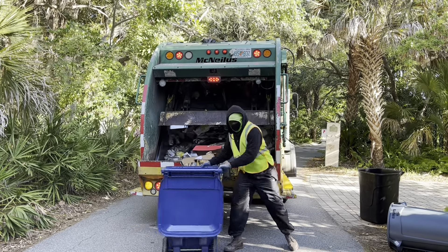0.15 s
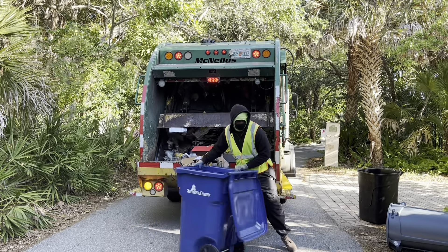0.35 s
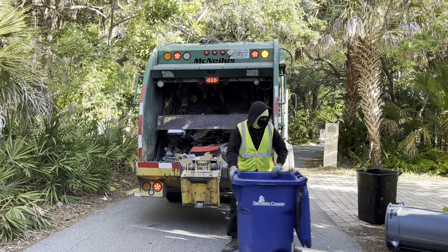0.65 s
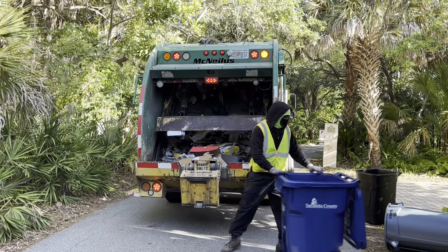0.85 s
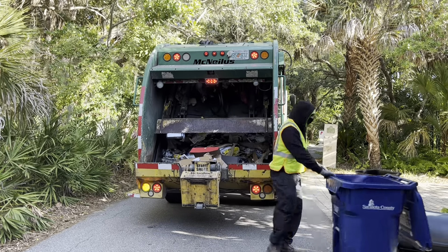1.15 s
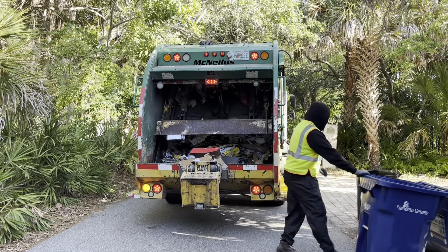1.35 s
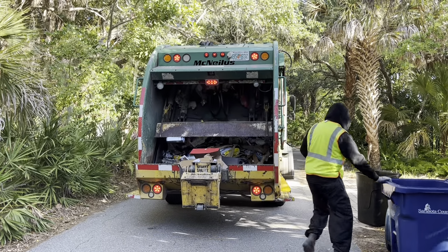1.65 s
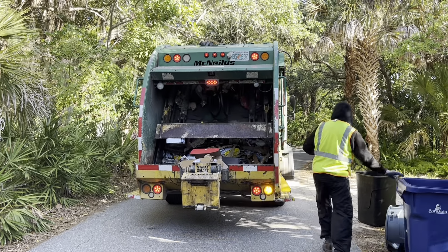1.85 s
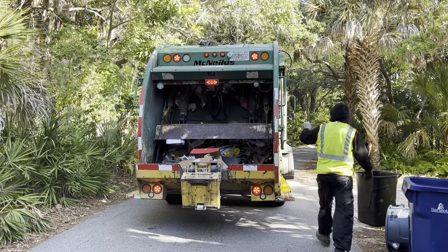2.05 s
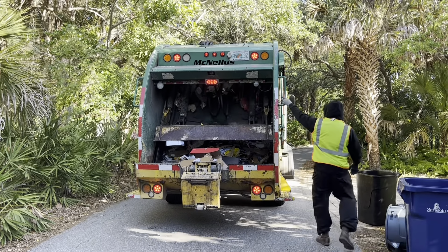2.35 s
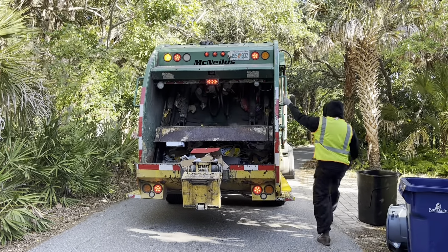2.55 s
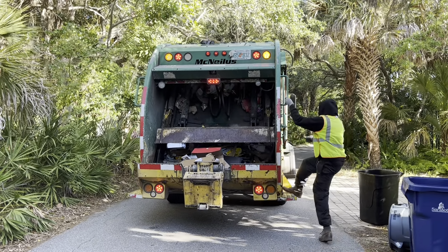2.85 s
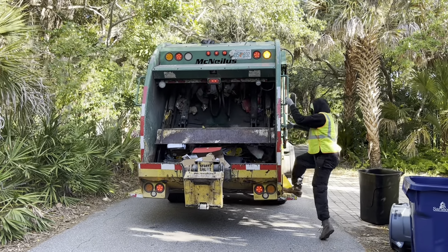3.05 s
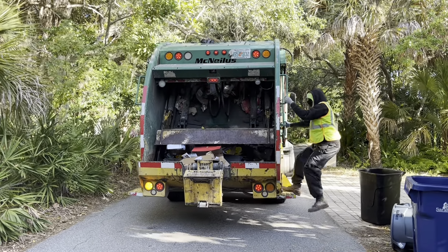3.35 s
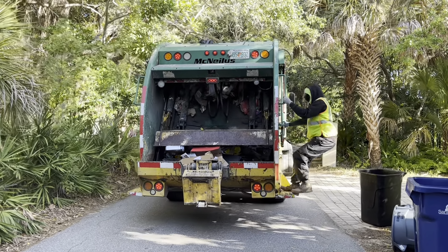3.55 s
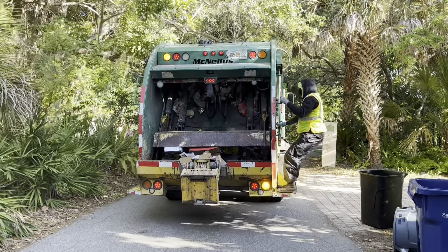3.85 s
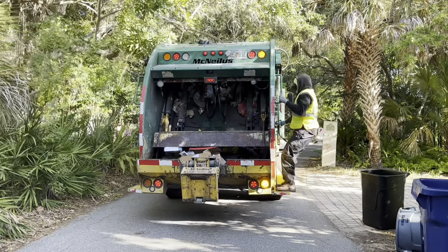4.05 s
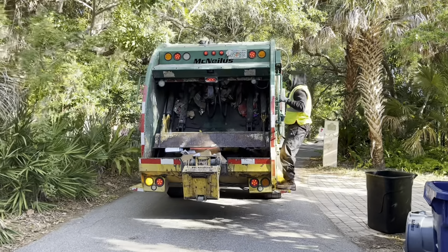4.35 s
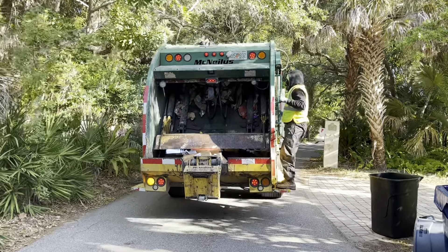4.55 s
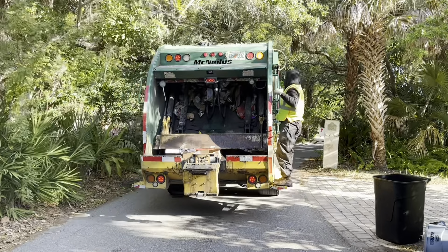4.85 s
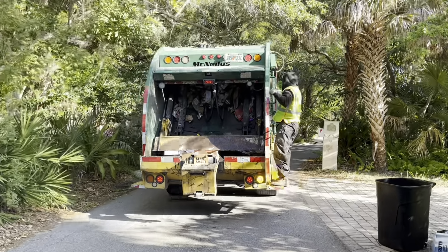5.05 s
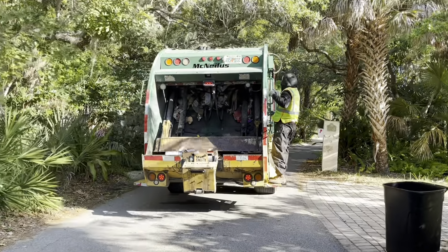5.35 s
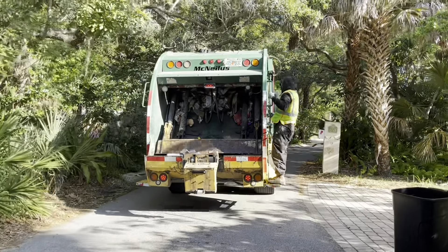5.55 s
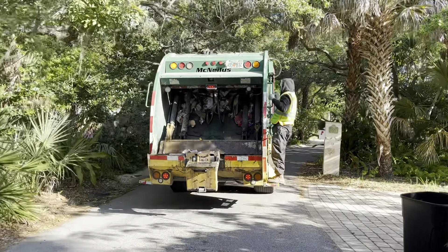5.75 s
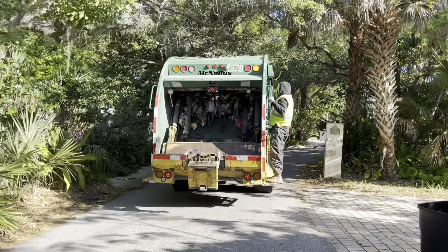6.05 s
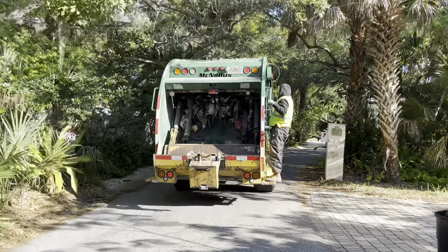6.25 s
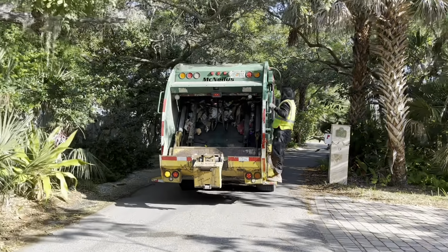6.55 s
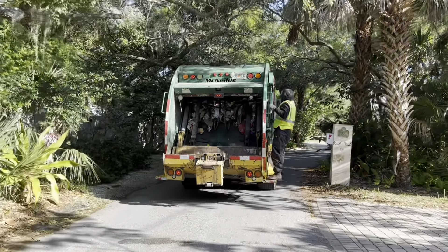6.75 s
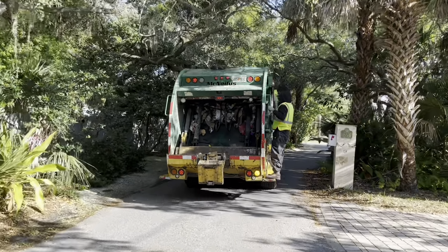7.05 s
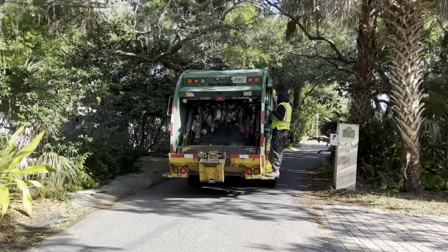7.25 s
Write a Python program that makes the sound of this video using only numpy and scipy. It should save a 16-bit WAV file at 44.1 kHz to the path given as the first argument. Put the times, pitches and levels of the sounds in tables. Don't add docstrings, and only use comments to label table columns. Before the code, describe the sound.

Close on a leafy street, a heavy diesel idles with a low hydraulic hum. An empty plastic wheeled bin slams its lid, booms and rattles over the ground, then is set down. A sharp air-brake hiss vents, a gear clunks, and the engine climbs steadily in pitch and loudness. Near the end loose steel bangs twice with a short squeak. Handheld phone, stereo, dry outdoor sound.

```python
import sys
import numpy as np
from scipy import signal
from scipy.fft import rfft, irfft, next_fast_len
from scipy.io import wavfile
from scipy.ndimage import uniform_filter1d, map_coordinates

SR = 44100
rng = np.random.default_rng(int(sys.argv[2]) if len(sys.argv) > 2 else 0)


def output_pcm(signal):
    pcm = np.clip(np.atleast_2d(signal).T, -1, 1) * 32767
    wavfile.write(sys.argv[1], SR, np.round(pcm).astype(np.int16))


def how_loud(loudness_db):
    steps = np.asarray(loudness_db, float) / 20
    return 10 ** steps


N = 325899
T = np.arange(N) / SR
DIRECT = np.array([[1], [0]])

# time in seconds, exhaust beat in Hz.
SPEED_HZ = [(0, 21.8), (1, 21.5), (1.75, 19.7), (2, 18.7), (2.4, 17.7), (2.8, 18.3), (3.2, 18.7),
            (3.89, 19.15), (4.1, 21.6), (4.28, 24.5), (4.49, 26.3), (5, 29.1), (5.5, 31.2), (6, 33),
            (6.47, 35.4), (6.8, 36.2), (7.14, 38.3), (7.39, 39.3)]
# time in seconds, exhaust note in dB, block roar in dB.
EFFORT_DB = [(0, -33, -34), (1, -32, -40.5), (1.9, -43, -41.5), (2.5, -39, -40.5), (3.1, -35.5, -39.5),
             (3.86, -35, -40), (4, -31.5, -36), (4.3, -28, -37), (4.6, -26.5, -35.5), (4.9, -24, -34.5),
             (5.5, -23.5, -32.5), (5.8, -23.5, -32), (6.1, -23, -33), (6.45, -23.5, -29.5),
             (6.76, -22, -28), (7, -21, -31), (7.39, -19, -31)]
# multiple of the beat, idle level in dB, loaded level in dB.
EXHAUST_ORDERS = [(2, 4, -0.5), (3, -1, -1), (4, 3, 0.5), (5, -5, -12), (6, 1, -5), (8, -21, -20),
                  (12, -6, -4), (16, -8, -2)]
# frequency in Hz, gain in dB.
PIPE_DB = [(40, -13.5), (60, -19), (68, -11.5), (77, -2), (100, 2), (120, -0.5), (150, -7), (200, -23.5)]
# time in seconds, width in seconds, change in dB.
STUMBLES_DB = [
    (2.235, 0.021, -4),
    (2.3, 0.013, -12),
    (6.54, 0.072, 3),
]
# harmonic number, level in dB.
PUMP_HARMONICS = [(1, 0), (2, 1), (3, -3), (4, -19), (5, -18)]
# frequency in Hz, level in dB.
PUMP_LINE_DB = [(115, -51), (125, -43), (135, -44.5), (165, -33.5), (182, -33.5), (213, -29.5),
                (226, -37.5), (245, -34.5), (265, -36)]
# frequency in Hz, level in dB per Hz.
BLOCK_DB = [(300, 2.5), (500, 0.5), (800, -7), (1200, -8.5), (1600, -9.5), (2100, -16), (3000, -18.5),
            (3800, -19.5), (5500, -23), (7500, -19.5), (10000, -22.5), (12000, -24), (14000, -22.5),
            (15500, -39)]
# time in seconds, centre in Hz, level in dB.
BELT_SIZZLE = [(0, 4450, -55), (1.95, 4060, -70), (2.1, 4150, -59), (2.6, 4420, -57), (3.1, 4380, -57),
               (3.7, 4380, -57), (4.1, 4620, -53), (4.4, 4600, -52), (5, 4480, -53), (6.3, 4420, -49),
               (7.39, 4320, -50)]

# time in seconds, wall shake in dB.
ROLL_DB = [
    (0, -62),
    (.1, -22),
    (.3, -22.5),
    (.5, -28),
    (.95, -22.5),
    (1.18, -26.5),
    (1.34, -27),
    (1.45, -47),
    (1.62, -31.5),
    (2.1, -35),
]
# frequency in Hz, width in Hz, level in dB.
DRUM_MODES = [(73, 42, -6.5), (107.8, 28.7, -1.5), (147, 40, -10.5), (273, 84, -6.5), (323, 24, -5.5),
              (403, 117, -1.5), (540, 1260, -16)]
# time in seconds, level in dB, t60 in seconds.
WHEEL_BUMPS = [(.14, -16, 0.24), (.324, -18.5, 0.46), (.42, -19.5, 1), (.7, -20, .2), (.733, -4.5, 0.22),
               (.803, -14, 0.12), (.956, -6.5, 0.1), (1.056, -12.5, 0.15), (1.217, -12.5, 0.33),
               (1.305, -14, 0.22), (1.345, -15, 0.26), (1.592, -20.5, 0.49)]
# time in seconds, peak in dB, treble in dB, wall note in Hz.
WALL_KNOCKS = [(0.034, -45, -5, 290), (0.117, -9.5, -3.5, 519), (0.136, -17, -13, 423),
               (0.159, -10.5, -13, 330), (0.193, -9, -15.5, 327.5), (0.265, -27.5, 0, 450),
               (0.274, -21, -5, 403), (0.323, -10.5, -22, 345), (0.357, -15, -32, 336),
               (0.457, -26, -30, 473), (0.49, -26, -28, 285), (0.617, -13, -30, 426),
               (0.705, -10.5, -27, 473), (0.752, -16, -25, 462), (0.817, -26, -47, 424),
               (0.875, -20.5, -24, 597), (0.908, -15, -21.5, 456), (1.033, -21.5, -21, 474),
               (1.138, -25, -24, 417), (1.306, -25, -32, 424), (1.584, -22, -20, 483),
               (1.635, -29.5, -16, 290), (1.66, -16, -45, 465), (1.809, -23.5, -25, 530),
               (1.825, -34, -3.5, 418), (1.868, -29, -19, 415), (1.962, -29, -14.5, 273),
               (2.257, -25.5, -25, 255), (2.314, -27.5, -35, 272)]
# frequency in Hz, level in dB per Hz.
PLASTIC_DB = [(600, 3.5), (900, 5.5), (1400, 1), (2000, -2.5), (3000, -9.5), (4200, -16), (6000, -22),
              (7500, -22), (8300, -29), (9300, -31), (11500, -38), (15500, -62)]
# time in seconds, level in dB, t60 in seconds.
LID_SLAMS = [
    (0.11, -10, 0.47),
    (.16, -19.5, 0.74),
    (.265, -26, 0.41),
    (.33, -22, 0.29),
    (1.58, -19.5, 0.057),
]
# time in seconds, level in dB, t60 in seconds.
AXLE_CLACKS = [(0.098, -23, 0.049), (0.115, -12.5, 0.068), (0.138, -14, 0.073), (.163, -23, 0.049),
               (.195, -26, 0.069), (.2704, -24, 0.036), (0.316, -17, 0.045), (.3353, -29, 0.037),
               (0.356, -19, 0.056), (.452, -33, 0.038), (.619, -31, 0.037), (.688, -29, 0.072),
               (.711, -27, 0.078), (.752, -21, 0.093), (.816, -38, 0.024), (.8755, -26.5, 0.045),
               (.889, -34, 0.049), (0.915, -30.5, 0.1), (.945, -31, 0.15), (0.994, -27, .06),
               (1.032, -29, 0.05), (1.058, -36, .05), (1.115, -35, .05), (1.135, -34, 0.11),
               (1.179, -31, .05), (1.2, -31.5, 0.087), (1.249, -40, 0.045), (1.308, -34, 0.041),
               (1.344, -32.5, 0.059), (1.936, -38, 0.054), (2.206, -36, 0.056), (2.258, -38, .04),
               (2.315, -37, .04)]
# frequency in Hz, width in Hz, gain in dB.
LID_MODES = [(1220, 73, 4.5), (1530, 170, 5), (1985, 80, 6), (2380, 160, 2.5), (3080, 250, 3),
             (3680, 250, 0), (4100, 200, 5.5)]
# time in seconds, level in dB, t60 in seconds.
GRIT_SCUFFS = [(0.032, -34.5, 0.089), (.114, -24.5, .04), (.15, -43, 0.27), (.266, -33, 0.32),
               (.452, -46, 0.06), (.615, -41, 0.19), (.69, -47, .1), (1.582, -36, 0.035), (1.6, -70, 0.36),
               (1.73, -55, .1), (1.827, -37.5, 0.083), (1.96, -51, 0.16), (2.225, -50, .15)]

# start in seconds, end in seconds, frequency in Hz, level in dB, width in Hz.
FUZZY_TONES = [(6.665, 6.748, 5930, -36, 300), (6.665, 6.748, 11860, -39, 300), (6.675, 6.7, 2990, -33, 80),
               (0, .1, 290, -34, 5), (.125, .22, 70, -17, 5), (6.485, 6.62, 62, -20, 5), (4.03, 4.13, 288, -37, 5),
               (4.035, 4.07, 3240, -46, 60), (4.068, 4.097, 3240, -43, 40), (4.064, 4.086, 1700, -37, 40),
               (1.75, 2.7, 273, -41, 2), (1.78, 1.99, 258, -38, 2), (2.69, 2.73, 4850, -46, 150),
               (2.7, 2.73, 4000, -47, 150), (2.755, 2.8, 2500, -47, 100), (2.73, 2.755, 1850, -47, 100),
               (2.9, 3.22, 14800, -62, 120), (1.215, 1.3, 8900, -57, 60), (1.89, 1.91, 11100, -52, 80),
               (1.91, 1.94, 11100, -60, 80), (.488, .503, 2050, -38, 60), (4.037, 4.054, 2080, -43, 60)]
# time in seconds, level in dB, frequency in Hz, t60 in seconds.
PART_RINGS = [(.096, -26, 2350, 0.07), (.113, -13, 2370, 0.063), (0.11, -15, 3000, 0.054),
              (.16, -18, 1950, 0.23), (0.16, -15, 1600, 0.34), (0.27, -25, 3900, .1),
              (0.268, -27, 3020, 0.063), (.332, -32, 2330, 0.061), (0.34, -20, 1400, 0.073),
              (.678, -33, 1750, 0.073), (0.7, -31, 1800, .08), (0.72, -31, 1200, .06),
              (1.586, -18, 200, 0.21), (1.587, -30, 1800, 0.063), (3.979, -34, 980, 0.093),
              (6.495, -23, 2100, .06), (6.512, -24.5, 1860, .16), (6.445, -29, 2100, 0.065),
              (7.4, -29, 2100, .06), (2.262, -24, 128, 0.082), (2.316, -32, 136, 0.09),
              (.165, -14, 330, 0.26), (.15, -16, 385, 0.22), (1.585, -24.5, 280, 0.18),
              (0.36, -22, 620, .08), (6.483, -23.5, 2600, 0.082), (6.535, -18, 460, 0.092),
              (.326, -16, 280, .3), (5.985, -29.5, 800, .12), (6.33, -36, 1150, 0.35),
              (7.28, -34.5, 1020, 0.38), (4.66, -35.5, 750, 0.38), (0.65, -19, 850, .06),
              (.816, -27, 950, 0.054), (.877, -26, 700, .05), (1.031, -27, 930, .07),
              (1.308, -30, 740, .06), (.619, -24, 740, 0.097), (.915, -26, 920, 0.066),
              (1.345, -24, 695, 0.048), (6.553, -26, 3000, .12), (6.719, -18.5, 994, 0.073),
              (6.741, -16, 713, 0.12), (.636, -16, 440, .16), (.395, -22, 270, .25),
              (6.495, -18.5, 175, 0.23), (6.735, -33, 2900, 0.1), (6.742, -21, 1310, 0.13),
              (6.762, -25, 2030, 0.089), (7.5, -33, 2000, .15)]
# time in seconds, peak in dB, t60 in seconds.
BODY_TICKS = [
    (0.752, -19.5, 0.03),
    (4.3812, -32.5, 0.046),
    (5.4573, -25, 0.049),
    (5.7395, -35, 0.05),
    (6.4476, -27.5, 0.073),
]

# time in seconds, jet level in dB.
VENT_DB = [
    (2.65, -76),
    (2.656, -40),
    (2.67, -39),
    (2.694, -33.5),
    (2.774, -35),
    (2.994, -55.5),
    (3.192, -55),
    (3.5, -64),
]
# frequency in Hz, level in dB per Hz.
JET_DB = [(700, 26.5), (1500, 0.5), (2300, -1.5), (3300, -4.5), (5000, -1.5), (7000, 3), (9000, 1.5),
          (11000, 1), (13000, -2.5), (15500, -3)]
# frequency in Hz, width in Hz, gain in dB.
NOZZLE_MODES = [(1800, 250, 5.5), (2450, 240, 6), (3320, 400, 8), (3940, 290, 7), (4700, 350, 7.5),
                (10240, 200, 3), (11300, 790, 4.5)]
# time in seconds, pitch in Hz, level in dB.
VALVE_WHISTLE = [
    (2.68, 3480, -70),
    (2.7, 3500, -41),
    (2.715, 3500, -35),
    (2.735, 3210, -37),
    (2.757, 3180, -36),
    (2.79, 3200, -65),
]

# time in seconds, peak in dB, thud in dB, treble in dB, t60 in seconds.
TRUCK_BANGS = [(4.032, -29, -8, -24, 0.21), (5.989, -22, -1, -29, 0.22), (6.468, -19, -3, -20, .1),
               (6.478, -11, 7, -15, 0.1), (6.491, -16.5, -8, -25, 0.26), (6.519, -18, 0, -24, 0.21),
               (6.534, -14.5, -10, -27, 0.11), (6.553, -16, -6, -9, 0.16), (6.579, -17, -3, -20, 0.19),
               (6.718, -9.5, -20, -7.5, 0.15), (6.727, -9.5, -10, -31, 0.14),
               (6.745, -16.5, 1.5, -25, 0.18), (6.779, -31, -3, -5, 0.19), (6.929, -25, 14, -5, 0.25)]
# frequency in Hz, level in dB per Hz.
STEEL_DB = [(50, 2), (80, 11), (150, -5), (300, -7), (500, -7), (900, -16), (1400, -22), (2000, -22),
            (3300, -23), (5000, -26), (7500, -24.5), (11500, -31.5), (15500, -43)]
# frequency in Hz, first blow in dB, second blow in dB, t60 in seconds.
LIFTER_MODES = [(352.7, -4, -1, 0.23), (515, 1, -18, 0.26), (711, -7.5, 2, 0.54), (985, -23, -5, 0.16),
                (1354, -29, -2, 0.19), (1710, -9, -26, 0.3), (1900, -13, -26, 0.4), (3390, -19, -9, 0.18),
                (4510, -17, -17, 0.33)]
# time in seconds, level in dB.
LIFTER_BLOWS = [
    (6.49, -18.5),
    (6.73, -17.5),
]

# frequency in Hz, left lead in radians.
LEAD_RAD = [(30, .3), (200, .6), (860, 0), (1380, -.8), (1560, -np.pi), (1700, -5.9), (3000, -5.4),
            (4300, -5.9), (5000, -6.2), (5700, -7.4), (7000, -8.2), (7800, -9.3), (8500, -3 * np.pi),
            (11200, -4 * np.pi), (12700, -4 * np.pi), (14600, -5 * np.pi)]
# frequency in Hz, likeness from 0 to 1.
LIKENESS = [(60, 0.99), (200, 1), (860, 0.82), (1250, 0.28), (1550, 0.8), (2200, 1), (3600, 0.54),
            (5000, 0.48), (6300, 0.49), (7800, 0.95), (8500, 1), (9800, 0.87), (11200, 0.84), (12600, .995),
            (13500, .5), (14700, 0.79)]
# frequency in Hz, left minus right in dB.
LEFT_DB = [(60, 3), (110, 3.5), (200, 5.5), (380, 5.5), (700, 8), (1290, 5.5), (2380, 2), (4400, 6.5),
           (8120, .5), (15000, 0)]
# time in seconds, left minus right in dB.
PAN_DB = [
    (0, -4),
    (.7, 0),
    (1.7, -0.2),
    (2.1, -1.5),
    (2.8, -3),
    (3.2, 0.5),
    (5, 1),
    (7.39, 0.9),
]


def unit(x):
    return x / np.sqrt(np.mean(x ** 2) + 1e-20)


def along(points, hz):
    f, v = np.transpose(points)
    return np.interp(np.log(hz + 1), np.log(f + 1), v)


def curves(rows):
    s, *cols = np.transpose(rows)
    return [np.interp(T, s, c) for c in cols]


def wobble(rate_hz):
    coarse = T[::32]
    knots = rng.standard_normal(int(N * rate_hz / SR) + 4)
    return np.interp(T, coarse, map_coordinates(knots, [coarse * rate_hz]))


def filtered(x, response):
    m = next_fast_len(N + 8192, True)
    return irfft(rfft(x, m) * response(np.fft.rfftfreq(m, 1 / SR)), m)[..., :N]


def band(lo_hz, hi_hz, spectrum=((1, 0),)):
    return lambda f: how_loud(along(spectrum, f)) / np.sqrt((1 + (lo_hz / (f + 1)) ** 8) * (1 + (f / hi_hz) ** 8))


def peaks(f, modes):
    return 1 + sum((how_loud(db) - 1) * w * w / (w * w + 4 * (f - c) ** 2) for c, w, db in modes)


def noise(colour, lumps_db=0., rate_hz=100.):
    m = next_fast_len(N, True)
    f = np.fft.rfftfreq(m, 1 / SR)
    re, im = rng.standard_normal((2, 2, len(f)))
    return unit(how_loud(lumps_db * wobble(rate_hz)) * irfft((re + 1j * im) * colour(f), m)[:, :N])


def evened(x, span_s):
    return x / np.sqrt(np.abs(uniform_filter1d(np.mean(x ** 2, 0), round(span_s * SR))) + 1e-12)


def tone(cycles, wander_rad, rate_hz):
    drift = wander_rad * np.array([wobble(rate_hz), wobble(rate_hz)])
    return np.sqrt(2) * np.sin(2 * np.pi * cycles + [[0], [np.pi / 2]] + drift)


def decays(times_s, dbs, t60s, rise_s):
    env = np.zeros(N + SR)
    for s, db, t60 in zip(times_s, dbs, np.abs(t60s)):
        t = np.arange(min(t60, 1) * SR // 1) / SR
        env[round(s * SR):][:len(t)] += how_loud(db - 60 * t / t60) * (1 - np.exp(-t / rise_s))
    return env[:N]


def exhaust(beat_hz, cycles, load, note_db):
    out = np.zeros((2, N))
    for k, idle_db, loaded_db in EXHAUST_ORDERS:
        level_db = note_db + along(PIPE_DB, k * beat_hz) + idle_db + (loaded_db - idle_db) * load ** 2
        out += how_loud(level_db + 1.7 * wobble(6)) * tone(k * cycles, wander_rad=.18, rate_hz=6)
    return out


def hydraulic_pump(beat_hz, cycles, load):
    ratio = 6.655
    line_db = along(PUMP_LINE_DB, ratio * beat_hz)
    unloaded_db = 9 * np.exp(-((T - 4.17) / 0.098) ** 2) + 6 * np.exp(-((T - 2.15) / 0.21) ** 2)
    out = np.zeros((2, N))
    for k, db in PUMP_HARMONICS:
        sink_db = ((6 * k - 1) * load + unloaded_db) * (k > 1)
        level_db = line_db + db - sink_db + (.8 + .7 * k) * wobble(5)
        out += how_loud(level_db) * tone(ratio * k * cycles, wander_rad=.25, rate_hz=6)
    return out


def turbo(beat_hz, load):
    return how_loud(-71 + 12 * np.log(load + .05)) * tone(np.cumsum(4300 + 112 * beat_hz) / SR, 1.4, 54)


def block_noise(cycles, roar_db, stumble_db):
    firing = 1 + 0.052 * np.cos(4 * np.pi * cycles)
    effort_db = roar_db + 41
    puff_db = 8 * np.exp(-((T - 4.74) / 0.17) ** 2)
    clatter_db = -50 + 1.123 * effort_db + 0.24 * puff_db
    out = how_loud(-37.5 + 0.75 * effort_db + stumble_db) * noise(band(41, 164), 0.69, 12)
    out += how_loud(roar_db - 3 + 0.3 * puff_db) * firing * noise(band(280, 1290, BLOCK_DB), 1.17, 25)
    out += how_loud(clatter_db - 2.5) * firing * noise(band(2030, 5000, BLOCK_DB), 0.87, 40)
    out += how_loud(-58.5 + effort_db + puff_db) * noise(band(3500, 11600, BLOCK_DB), 0.73, 40)
    housing = lambda f: band(1600, 2300)(f) * peaks(f, [(1772, 90, 6.1)])
    return out + how_loud(clatter_db - 5) * noise(housing, 1.1, 30)


def belt():
    hz, db = curves(BELT_SIZZLE)
    fuzz = noise(band(1, 160), 2.1, 30)
    return how_loud(db + 3.2) * fuzz * np.cos(2 * np.pi * np.cumsum(hz + 60 * wobble(5)) / SR)


def engine():
    (beat_hz,), (note_db, roar_db) = curves(SPEED_HZ), curves(EFFORT_DB)
    cycles = np.cumsum(beat_hz) / SR
    load = np.clip((beat_hz - 19) / 6, 0, 1)
    stumble_db = sum(db * np.exp(-((T - s) / width_s) ** 2) for s, width_s, db in STUMBLES_DB)
    out = exhaust(beat_hz, cycles, load, note_db + stumble_db)
    out += hydraulic_pump(beat_hz, cycles, load) + turbo(beat_hz, load)
    return out + block_noise(cycles, roar_db, stumble_db) + belt()


def drum(f):
    return sum((-1) ** k * how_loud(db) * 1j * f * w / (c * c - f * f + 1j * f * w)
               for k, (c, w, db) in enumerate(DRUM_MODES))


def cart_boom(shake):
    bumps = decays(*np.transpose(WHEEL_BUMPS), 0.0045)
    out = (how_loud(1) * shake + 0.24 * bumps) * evened(noise(lambda f: drum(f) * band(45, 175)(f)), 0.0295)
    bump_s = np.transpose(WHEEL_BUMPS)[0]
    since_s = T - bump_s[np.searchsorted(bump_s, T).clip(1) - 1]
    return out + 1.45 * DIRECT * bumps * np.sin(2 * np.pi * 98.5 * since_s)


def cart_walls(shake):
    s, db, treble_db, note_hz = np.transpose(WALL_KNOCKS)
    t60 = 0.082 + 0.0011 * (db + 35.5)
    blows = decays(s, db - 9, t60, .0008)
    edges = decays(s, db + treble_db, 1.56 * t60, 0.0014)
    walls = evened(noise(lambda f: drum(f) * band(200, 900)(f)), 0.0118)
    out = (how_loud(-5.5 + 3.05 * wobble(49.95)) * shake + 1.03 * blows) * walls
    struck = np.searchsorted(s, T).clip(1) - 1
    out += 2.46 * DIRECT * blows * np.sin(2 * np.pi * note_hz[struck] * (T - s[struck]))
    out += 0.41 * blows * evened(noise(band(550, 1040)), 0.0052)
    return out + edges * noise(band(2700, 11500, PLASTIC_DB), 1.16, 200)


def cart_lid(shake, slams):
    clacks = decays(*np.transpose(AXLE_CLACKS), 0.0005)
    rattle = (how_loud(-17.5) * shake + how_loud(-8.5) * slams) * how_loud(2 * wobble(140))
    plastic = noise(lambda f: band(730, 5500, PLASTIC_DB)(f) * peaks(f, LID_MODES))
    return (rattle + 0.66 * clacks) * evened(plastic, 0.0039)


def cart_grit(shake, slams):
    level = how_loud(-25.5) * np.sqrt(shake * 0.058) + how_loud(-29) * slams
    level = level + decays(*np.transpose(GRIT_SCUFFS), 0.0013)
    spectrum = [(4000, -1), (9000, 3.5), (14000, -6), (14800, -20), (15500, -30)]
    return level * noise(band(2400, 18000, spectrum), 2.6, 200)


def cart():
    shake = how_loud(curves(ROLL_DB)[0]) * np.clip((2.1 - T) / 0.39, 0, 1)
    slams = decays(*np.transpose(LID_SLAMS), 0.0016)
    return cart_boom(shake) + cart_walls(shake) + cart_lid(shake, slams) + cart_grit(shake, slams)


def squeaks_and_hums():
    out = np.zeros(N)
    for start, end, hz, db, width_hz in FUZZY_TONES:
        now = slice(round(start * SR), round(end * SR))
        t = T[now]
        fade = np.clip(np.minimum(t - start, end - t) / .006, 0, 1)
        level = fade * how_loud(db + 2.2 * wobble(70)[now])
        out[now] += level * np.sin(2 * np.pi * (hz * t + .14 * wobble(width_hz)[now]))
    return DIRECT * out


def pings():
    out, t = np.zeros(N + SR), T[:SR // 4]
    for s, db, hz, t60 in PART_RINGS:
        ring = how_loud(db - 60 * t / abs(t60)) * np.sin(2 * np.pi * hz * t)
        out[round(s * SR):][:len(t)] += ring * (1 - np.exp(-t / .0007))
    return DIRECT * out[:N]


def ticks():
    s, db, t60 = np.transpose(BODY_TICKS)
    return decays(s, db - 5, t60, .0004) * evened(noise(band(2200, 8500)), .003)


def brake():
    on = np.clip((T - 2.658) / 0.012, 0, 1) * np.clip((3.5 - T) / .15, 0, 1)
    hz, db = curves(VALVE_WHISTLE)
    whistle = how_loud(db - 3 + 4 * wobble(90)) * tone(np.cumsum(hz) / SR, wander_rad=1.2, rate_hz=130)
    air = noise(lambda f: band(1600, 16500, JET_DB)(f) * peaks(f, NOZZLE_MODES), 1.0, 60)
    return on * (how_loud(curves(VENT_DB)[0] + 4.5) * air + whistle * (T < 2.8))


def gear():
    t = np.maximum(T - 3.982, 0)
    thump = how_loud(-21 - 60 * t / .09) * np.sin(2 * np.pi * 490 * t) * (1 - np.exp(-t / .003))
    scrape = np.clip(t / .012, 0, 1) * np.clip((4.13 - T) / .06, 0, 1)
    return DIRECT * thump + how_loud(-37.5) * scrape * noise(band(290, 3300, PLASTIC_DB), 0.44, 120)


def lifter():
    s, db, thud_db, treble_db, t60 = np.transpose(TRUCK_BANGS)
    thuds = decays(s, db + thud_db - 9, 2.66 * t60, 0.013) * (T > 6.4)
    out = thuds * evened(noise(band(52, 260, STEEL_DB)), 0.032)
    crash = decays(s, db - 7, 1.1 * t60, .004) * how_loud(wobble(150))
    out += crash * evened(noise(band(260, 3800, STEEL_DB)), .01)
    out += decays(s, db + treble_db - 7, 1.7 * t60, 0.0042) * noise(band(3900, 16500, STEEL_DB), 0.8, 230)
    for k, (start, ring_db) in enumerate(LIFTER_BLOWS):
        first = round(start * SR)
        t = T[first:] - start
        ring = sum(how_loud(ring_db + dbs[k] - 60 * t / mode_t60) * np.sin(2 * np.pi * hz * t)
                   for hz, *dbs, mode_t60 in LIFTER_MODES)
        out[:, first:] += DIRECT * ring * (1 - np.exp(-t / 0.0051))
    return out


def ports(pair, lean, spread):
    m = next_fast_len(N + 8192, True)
    f, sign = np.fft.rfftfreq(m, 1 / SR), np.array([[.5], [-.5]])
    turn = np.arccos(np.clip(along(LIKENESS, f), 0, 1) ** spread) / 2
    direct, scattered = rfft(pair, m)
    both = np.cos(turn) * direct + 2 * sign * np.sin(turn) * scattered
    both = both * how_loud(sign * lean * along(LEFT_DB, f)) * np.exp(1j * sign * along(LEAD_RAD, f))
    return irfft(both, m)[:, :N] * how_loud(sign * curves(PAN_DB)[0])


def scene():
    near_things = cart() + squeaks_and_hums() + pings() + ticks() + gear() + lifter()
    out = ports(engine(), lean=1.0, spread=1.4) + ports(near_things, lean=0.97, spread=0.94)
    return out + ports(brake(), lean=0.91, spread=0.55)


def roll_off(x):
    return signal.sosfilt(signal.butter(12, 15730, fs=SR, output="sos"), x)


def record(dry):
    x = filtered(dry, lambda f: (1j * f / (35 + 1j * f)) ** 2 * (f < 15730))
    x = x / (1 + np.abs(x / .98) ** 6) ** (1 / 6)
    return roll_off(x)


dry = scene()
out = record(dry)
output_pcm(out)
```